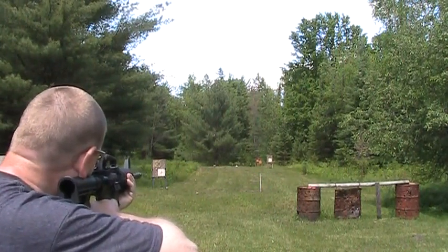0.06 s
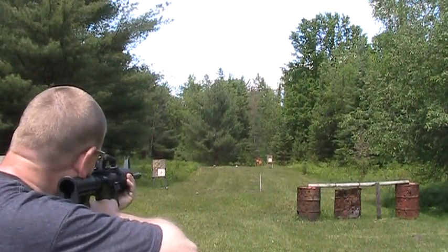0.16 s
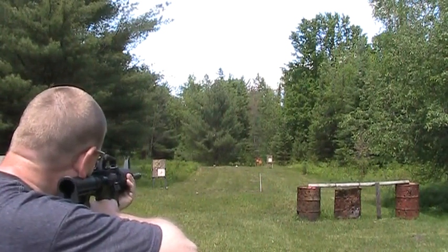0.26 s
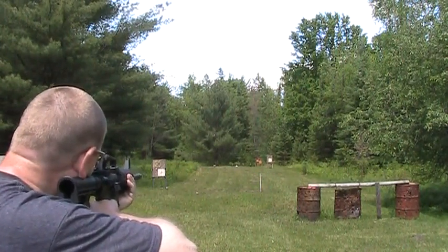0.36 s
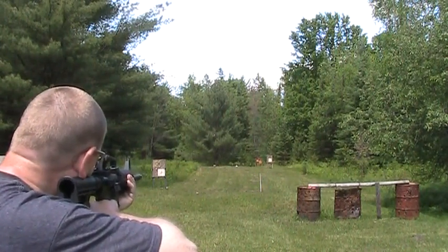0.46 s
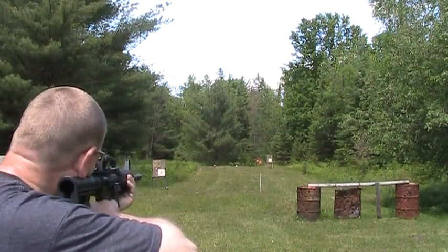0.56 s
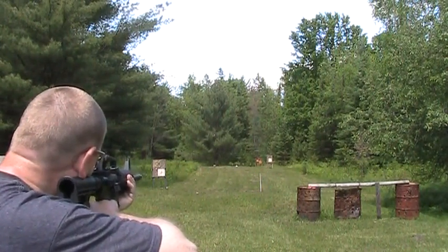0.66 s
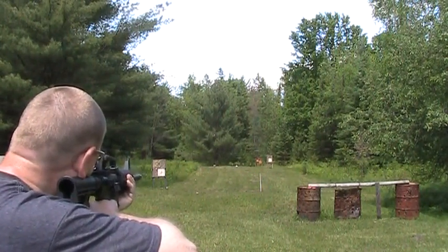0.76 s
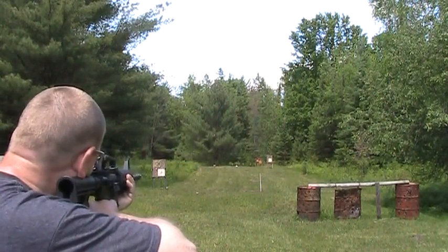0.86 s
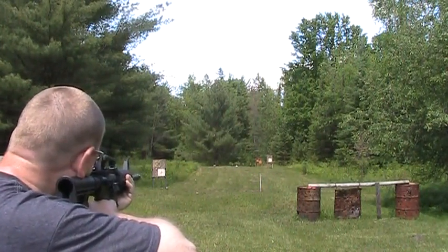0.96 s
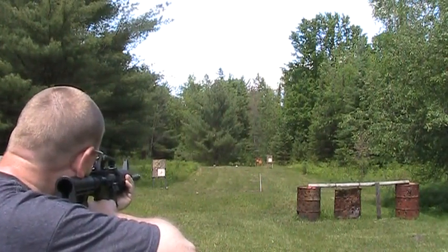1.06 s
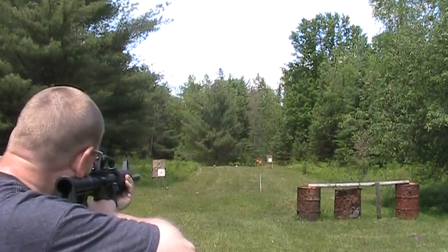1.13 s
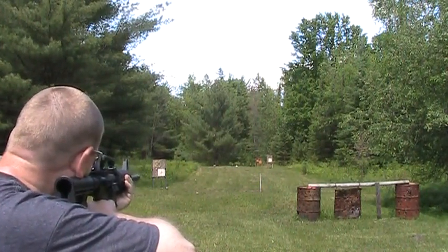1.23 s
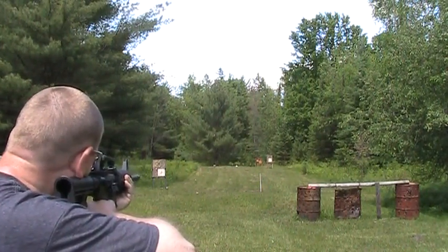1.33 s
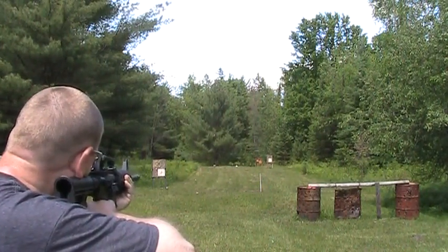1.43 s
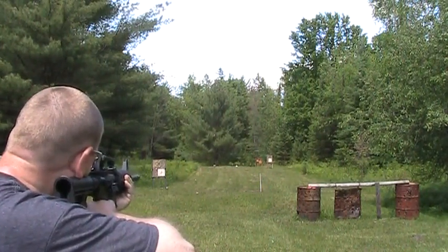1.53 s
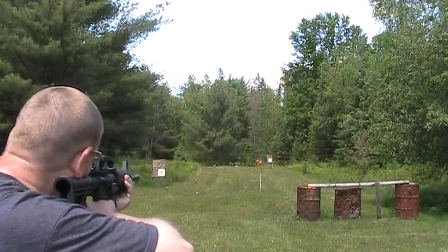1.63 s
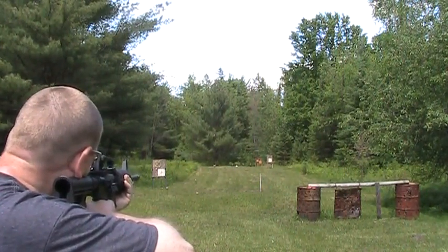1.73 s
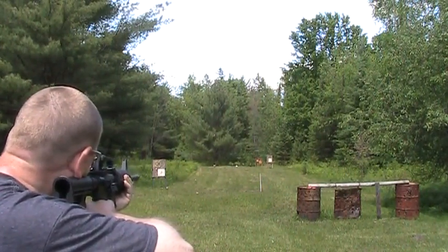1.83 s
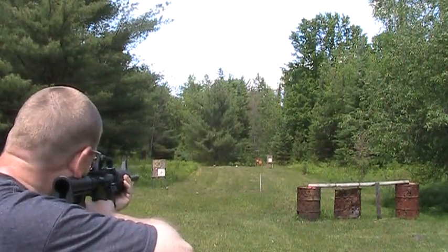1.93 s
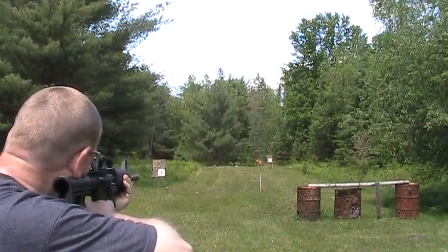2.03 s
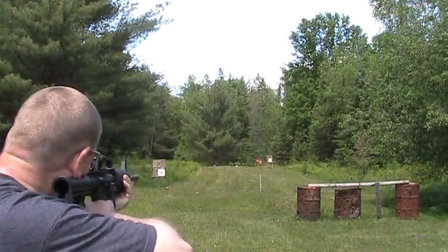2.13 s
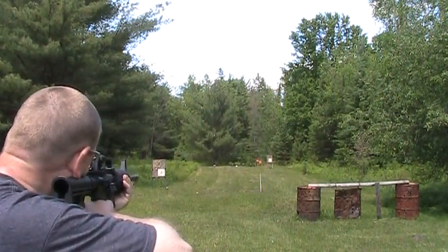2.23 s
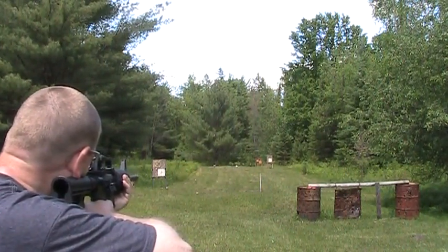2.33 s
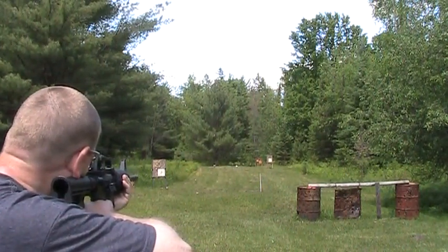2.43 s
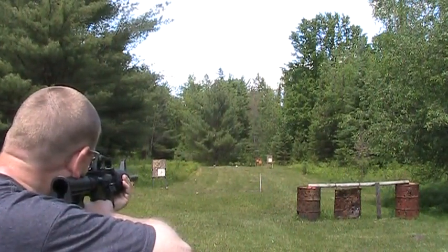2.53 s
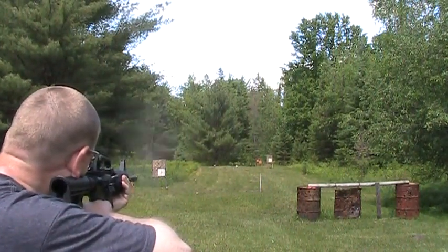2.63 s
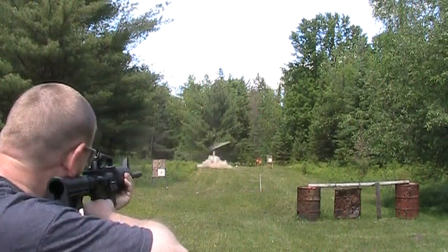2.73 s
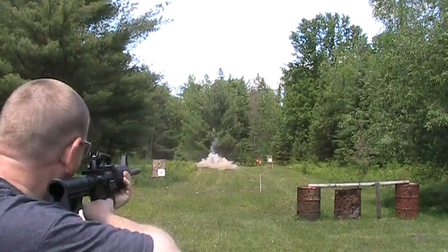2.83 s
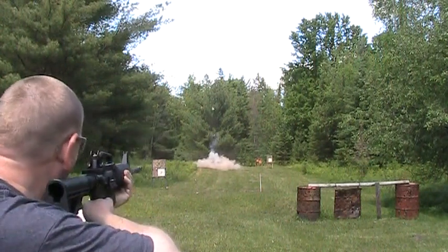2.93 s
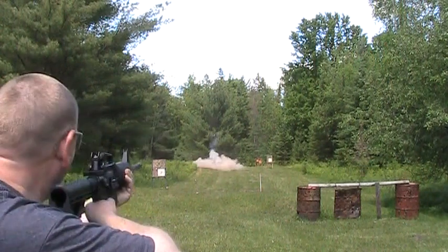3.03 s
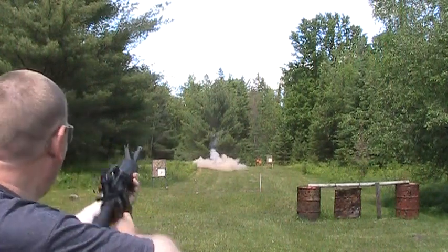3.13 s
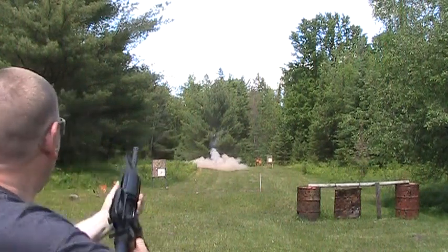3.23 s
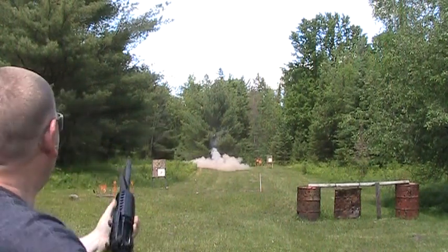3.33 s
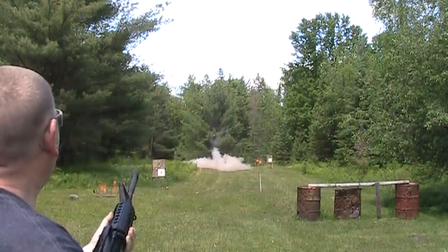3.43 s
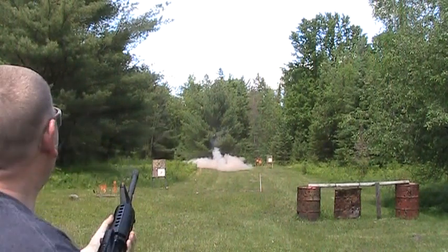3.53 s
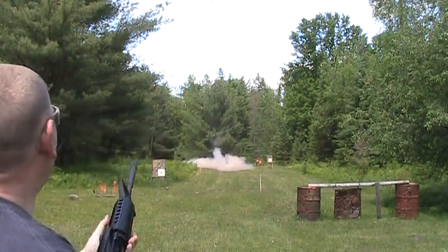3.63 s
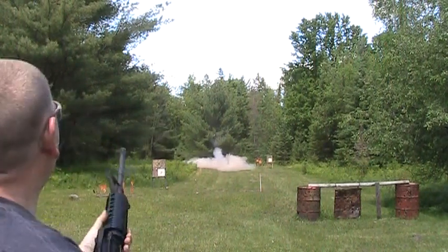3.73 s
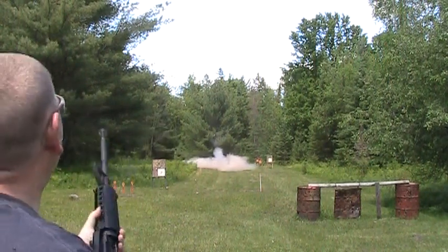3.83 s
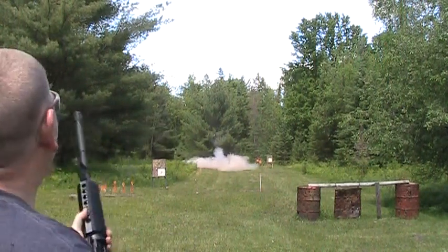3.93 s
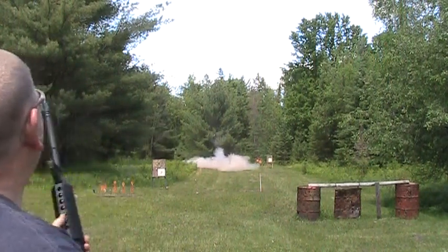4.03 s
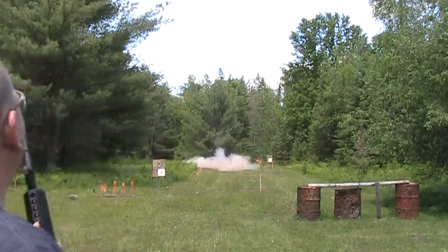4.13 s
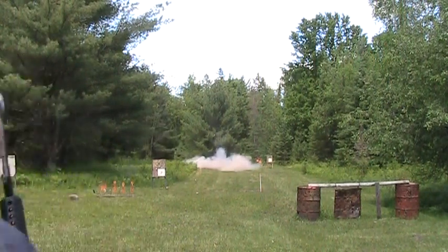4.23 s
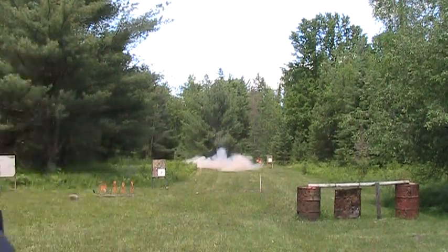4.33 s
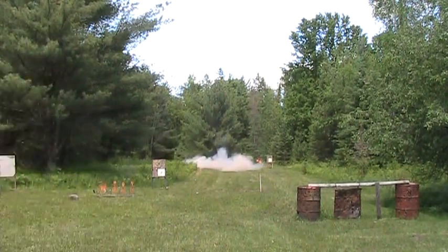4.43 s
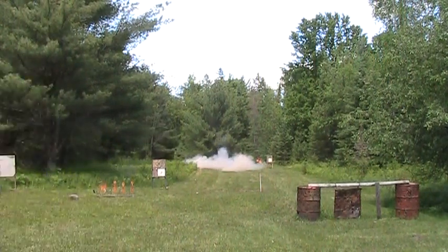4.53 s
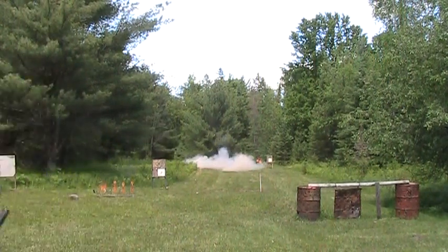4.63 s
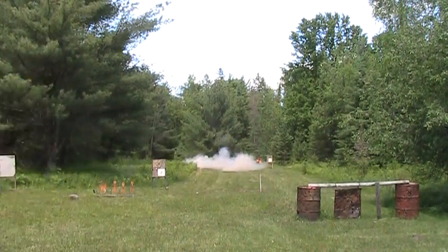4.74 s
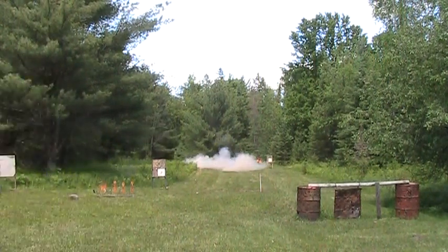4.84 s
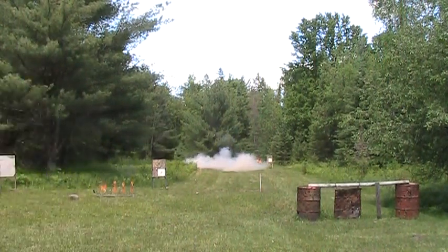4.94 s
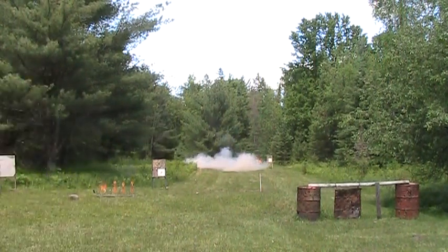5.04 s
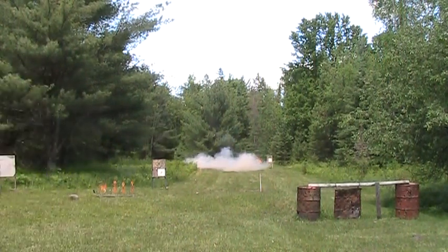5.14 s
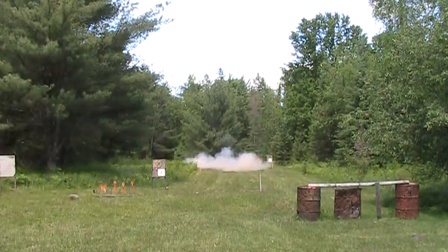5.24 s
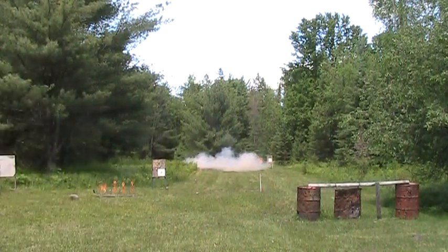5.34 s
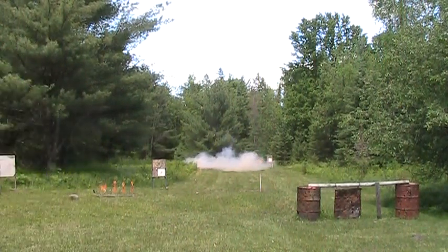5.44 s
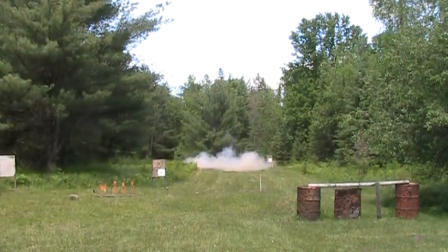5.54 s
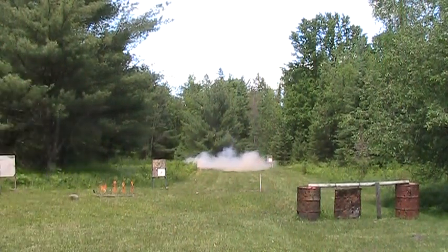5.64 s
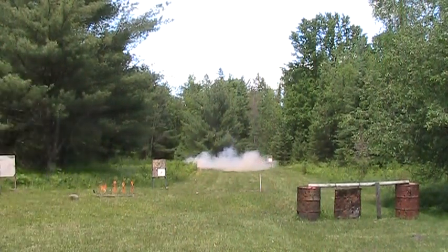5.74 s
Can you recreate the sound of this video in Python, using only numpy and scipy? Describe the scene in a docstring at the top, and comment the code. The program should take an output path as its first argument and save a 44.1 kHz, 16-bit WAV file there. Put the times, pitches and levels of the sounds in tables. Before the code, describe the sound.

Outdoors on a grassy range ringed by trees, soft air hush and quick high bird whistles come first. A rifle cracks close by, and a fifth of a second later a bigger explosion booms, overloading the microphone. Its roar rolls through the woods for over a second, then fades into low rumble, with a brass case ping, faint cloth rustle, dry snaps and wind thumps.

```python
"""A rifle is fired down a grassy range ringed by forest; a fifth of a second later its exploding target
answers. Both are sharp shock fronts that overload the microphone, then shaped noise that rolls through the
trees, duller with every metre of air. The spent case pings as a few decaying resonances. A small bird twitters
in gliding whistles before the shot. Clothes rustle, a few dry snaps sound nearby and a breeze bumps the
microphone: all bursts of coloured noise over a steady hush."""
import sys
import numpy as np
from scipy import signal
from scipy.fft import rfft, irfft, next_fast_len
from scipy.io import wavfile

SR = 44100
rng = np.random.default_rng(int(sys.argv[2]) if len(sys.argv) > 2 else 0)


def output_pcm(signal):
    """Save a mono or channel-first signal as 16-bit PCM at the path in sys.argv[1].

    Samples are clipped to [-1, 1] before scaling.
    """
    pcm = np.clip(np.atleast_2d(signal).T, -1, 1) * 32767
    wavfile.write(sys.argv[1], SR, np.round(pcm).astype(np.int16))


N = 255339
TIME = np.arange(N) / SR  # s
SIZE = next_fast_len(N)
FREQS = np.maximum(np.arange(SIZE // 2 + 1) * SR / SIZE, 1)  # Hz
SIDES = np.array([[1], [-1]])  # sign of the side signal in left and right
SHOT_S, BLAST_S = 2.7738, 2.9892

# stereo width of the echoes from the woods: frequency_hz, side_minus_mid_db
WOODS_WIDTH = [(60, -3), (120, -11), (300, -21.5), (700, -14), (1300, -11), (2400, -8), (8000, -3),
               (15000, 4)]
# colour of cloth and of small ticks: frequency_hz, relative_level_db
RUSTLE_COLOUR = [(1000, 0), (3000, 2.5), (5000, -2.5), (7500, -4), (11000, -12.5), (15500, -17)]


def from_db(db):
    """Decibels to gain."""
    return 10 ** (np.asarray(db) / 20)


def at_hz(points, hz):
    """A spectrum in dB read on a log-frequency axis."""
    points = np.array(points)
    return np.interp(np.log(hz), np.log(points[:, 0]), points[:, 1])


def butter(x, hz, kind, order=2):
    """Causal low- or high-pass."""
    sections = signal.butter(order, min(hz, .45 * SR), kind, fs=SR, output="sos")
    return signal.sosfilt(sections, x + 1e-18)


def filtered(spectrum):
    """Stereo spectrum back to sound."""
    return irfft(spectrum, SIZE)[:, :N]


def dying(start, t60):
    """Envelope that jumps to 1 and falls 60 dB in t60 seconds."""
    return (TIME >= start) * np.exp(-np.log(1000) * np.clip((TIME - start) / t60, 0, 10))


def swell(centre, half):
    """Bell-shaped envelope of height 1."""
    return np.exp(-np.minimum(((TIME - centre) / half) ** 2 / 2, 20))


def together(*levels):
    """Levels of unrelated sounds add in power."""
    return np.sqrt(sum(level ** 2 for level in levels))


def wander(per_s):
    """Random drift with a spread of about 1, heading for per_s new values a second."""
    return np.interp(TIME * per_s, np.arange(1024), rng.standard_normal(1024))


def noise(colour, side_db, grain=1):
    """Stereo noise of a given colour and width, its middle at rms 1; grain weights each of its tiny impulses."""
    mid, side = rfft(rng.standard_normal((2, N)) * grain, SIZE) * from_db(at_hz(colour, FREQS))
    x = filtered(mid + side * from_db(side_db) * SIDES)
    return x / x.mean(axis=0).std()


def trees(uneven_db, size=64):
    """Uneven strength of tiny grains, size samples each, such as the echoes of trunks and crowns."""
    return from_db(uneven_db * np.repeat(rng.standard_normal(N // size + 1), size)[:N])


def through_air(x, start, loss_db, power):
    """Later echoes have crossed more air: loss_db per second at 1 kHz, rising as a power of frequency."""
    spectrum, age, out = rfft(x, SIZE), np.maximum(TIME - start, 0), 0
    centres = np.geomspace(250, 16000, 16)  # Hz
    for hz, pick in zip(centres, np.eye(len(centres))):
        # overlapping triangular bands that add up to the whole spectrum
        band = filtered(spectrum * np.interp(FREQS, centres, pick))
        out = out + band * from_db(-loss_db * (hz / 1000) ** power * age)
    return out


def hush():
    """A steady hush under everything: noise that sinks from the shot to the blast, then slowly comes back up."""
    # colour of the steady hush: frequency_hz, relative_level_db
    hush_colour = [(25, -9.5), (45, -11), (90, -1), (150, -4), (190, 2.5), (235, -2.5), (600, -5.5),
                   (1200, -11), (2400, -17.5), (4300, -22.5), (5600, -22.5), (7000, -26), (11000, -32),
                   (15500, -34.5)]
    # its stereo width: frequency_hz, side_minus_mid_db
    hush_width = [(100, 3.5), (400, 3.5), (2400, 3.5), (5000, 4.5), (15000, 0)]
    level_db = -57 + np.interp(TIME, [SHOT_S, BLAST_S, 5.8], [0, -15, -4])
    return from_db(level_db) * noise(hush_colour, at_hz(hush_width, FREQS))


def breeze():
    """Eddies push on the two microphone ports, often in opposite directions."""
    # gusts on the microphone: centre_s, level_db, half_length_s, side_minus_mid_db
    gusts = [(0.195, -54.5, 0.11, 1), (0.627, -37, 0.029, 7), (0.797, -43, 0.091, 5),
             (1.316, -44.5, 0.07, 6.5), (1.634, -49, 0.11, 7), (4.85, -33, 0.014, 8),
             (5.033, -34.5, .025, 9), (5.153, -28, 0.025, 11), (5.34, -34, 0.074, 16),
             (5.562, -26, 0.029, 10), (5.643, -33, 0.031, 17), (5.763, -42, 0.041, 15.5)]
    # colour of the gusts: frequency_hz, relative_level_db
    gust_colour = [(20, 5), (45, 0.5), (85, 4), (150, -13), (300, -18), (700, -44), (2000, -68)]
    common, opposed = noise(gust_colour, 0)
    out = 0
    for s, db, half, side_db in gusts:
        side = from_db(side_db)
        push = (common + side * opposed * SIDES) / np.hypot(1, side)
        out = out + from_db(db) * swell(s, half) * push
    return out


def clothes():
    """Cloth slides in many tiny slips as the shooter lowers the rifle and steps aside, swelling with each stroke."""
    # strokes of cloth: centre_s, level_db, half_length_s
    strokes = [(4.249, -54, .011), (4.32, -59.5, .08), (4.672, -58.5, 0.064), (4.83, -60.5, 0.042),
               (5.005, -56, .022), (5.069, -58.5, .02)]
    moving_s, moving_db = 3.9, -64.5  # the faint rustle under the strokes
    moving = from_db(moving_db) * np.clip((TIME - moving_s) / .12, 0, 1)
    level = together(moving, *[from_db(db) * swell(s, half) for s, db, half in strokes])
    return noise(RUSTLE_COLOUR, -2.5, trees(uneven_db=2.0)) * level


def snaps():
    """Dry snaps arrive diffuse: noise with a quick rise, a short decay and a faint tail."""
    # the snaps: start_s, level_db, t60_s, brightness_db_per_octave
    clacks = [(1.258, -47, 0.1, -2), (2.659, -35.5, 0.081, -0.5), (5.511, -39.5, 0.11, -1),
              (5.589, -38.5, 0.11, 0.5), (5.722, -49.5, 0.18, -5.5)]
    # their common colour: frequency_hz, relative_level_db
    clack_colour = [(200, -21), (800, -4.5), (1400, -1), (1900, -1.5), (2550, 3), (3400, 1.5), (4600, -1),
                    (5700, -1.5), (6500, 0), (8500, -8.5), (10000, -10), (15500, -25)]
    spectrum, out = rfft(noise(clack_colour, -1.5), SIZE), 0
    octaves = np.log2(np.maximum(FREQS, 700) / 4000)  # the tilt pivots at 4 kHz
    for s, db, t60, tilt_db in clacks:
        burst = filtered(spectrum * from_db(tilt_db * octaves))
        decay = dying(s, t60) + from_db(-18.0) * dying(s, t60=0.27)
        rise = np.clip((TIME - s) / 0.0058, 0, 1)
        out = out + from_db(db) * burst * decay * rise
    return out


def whistle(s, db, hz, shape):
    """One bird note: a sine whose glide bends downward."""
    # note shapes by name: level_db, pitch_offset_hz, glide_hz_per_ms, half_length_s
    notes = {"soft": (-7.5, -390, -20, .004), "up": (-1.5, 30, 90, .0037), "down": (0, -10, -36, .0078)}
    note_db, offset_hz, glide, half = notes[shape]
    near, out = np.abs(TIME - s) < 3 * half, np.zeros(N)
    t = TIME[near] - s
    ms = 1000 * t
    pitch = hz + offset_hz + glide * ms - 3.0 * ms ** 2
    envelope = np.exp(-np.abs(t / half) ** 3.5)
    out[near] = from_db(db + note_db) * envelope * np.sin(2 * np.pi * np.cumsum(pitch) / SR)
    return out


def bird():
    """Quick phrases of short whistles, with a scatter from the leaves and a faint wash behind."""
    # the phrases: first_note_s, level_db, pitch_hz, first_gap_s, later_gaps_s, note_names
    phrases = [(.043, -48.5, 5680, .038, .038, "up down"), (.197, -48, 5750, 0.027, .036, "soft down down"),
               (0.511, -47.5, 5760, 0.029, .033, "soft down down"),
               (.77, -46, 5750, 0.027, .033, "soft down down"),
               (.985, -46, 5770, 0.027, .036, "soft down down"),
               (1.536, -45.5, 5760, 0.031, .034, "soft down down"),
               (1.764, -45.5, 5760, .022, .036, "soft up down"),
               (2.005, -45.5, 5790, .02, .0375, "soft up down down"),
               (2.299, -46.5, 5770, 0.022, .0385, "soft up down down")]
    growth_db = .8  # each note outdoes the one before
    song = np.zeros(N)
    for s, db, hz, first_gap, later_gap, shapes in phrases:
        for k, shape in enumerate(shapes.split()):
            song += whistle(s, db + k * growth_db, hz, shape)
            s += later_gap if k else first_gap
    leaves = rng.standard_normal((2, N)) * (dying(.014, t60=.14) + .2 * dying(.02, t60=.75))
    leaves /= np.linalg.norm(leaves[0])
    wash = signal.fftconvolve(song[None], leaves, axes=1)[:, :N]
    return song + from_db(-8.5) * wash


def metal():
    """Small hard contacts tick; the first sets the modes of the brass case ringing."""
    # the spent case lands, then the rifle's fittings tick: start_s, level_db
    contacts = [(3.5093, -32.5), (3.841, -54), (4.239, -61), (4.4227, -52), (4.525, -53), (4.86, -51),
                (5.2289, -68.5)]
    # modes of the case, close pairs beat: frequency_hz, relative_level_db, t60_s
    case_modes = [(5700, 10.5, 0.018), (6240, 9, .025), (10940, -19.5, 0.27), (10985, -24, .22),
                  (14890, -7.5, .24), (14935, -14, .2)]
    case_ring_db = -42.5
    levels = sum(from_db(db) * dying(s, t60=0.016) for s, db in contacts)
    out = levels * butter(noise(RUSTLE_COLOUR, 2.0), 4500, "high")
    blow = np.zeros(N)
    blow[round(contacts[0][0] * SR)] = from_db(case_ring_db)
    for hz, db, t60 in case_modes:
        # two-pole resonator: pole radius r, angle w
        r, w = from_db(-60 / (t60 * SR)), 2 * np.pi * hz / SR
        ring = signal.lfilter([0, np.sin(w)], [1, -2 * r * np.cos(w), r * r], blow + 1e-18)
        # the spinning case shows its open end to each side in turn, 47 times a second
        phase = rng.uniform(0, 2 * np.pi, (2, 1))
        tumble = 1 + .45 * np.sin(2 * np.pi * 47 * TIME + phase)
        out += from_db(db) * ring * tumble
    return out


def explosion():
    """The forest returns the blast as a long roar over a slower rumble whose deepest part follows the roar."""
    # colour of the roll on arrival: frequency_hz, relative_level_db
    roll_colour = [(20, -23), (42, -13), (70, 2), (115, 1), (175, -2), (250, -4.5), (400, 0.5), (650, 3.5),
                   (1100, 2), (2200, -1.5), (4500, -7.5), (7500, -11), (11000, -22.5), (16000, -28.5)]
    # the roar holds while the blast crosses the forest, then dies away over a distant tail
    roar_db, sag_db_per_s, hold_s, release_db_per_s = -12.5, -0.4, 1.238, 17  # negative sag: it grows
    distant_db, distant_db_per_s = -18, 3.5
    # the rumble: a first thump, then a long decay
    thump_db, thump_t60_s = -17.5, 1.84
    rumble_db, rumble_db_per_s = -34, 4.5
    deep_db, deep_follows = -33, 0.86  # the exponent sets how far the deepest part follows the roar
    # the far tree line returns a dull swell of its own
    return_db, return_s, return_half_s, return_hz = -26.5, 4.28, 0.22, 406

    width_db = at_hz(WOODS_WIDTH, FREQS)
    scatter = noise(roll_colour, width_db, trees(uneven_db=0.65))
    spectrum = rfft(scatter, SIZE)
    bass, deep = [filtered(spectrum / (1 + (FREQS / hz) ** 4)) for hz in (210, 90)]

    age = np.maximum(TIME - BLAST_S, 0)
    forest_db = roar_db - sag_db_per_s * age - release_db_per_s * np.maximum(age - hold_s, 0)
    roll = together(from_db(forest_db), from_db(distant_db - distant_db_per_s * age))
    roar = through_air(scatter - bass, BLAST_S, loss_db=6.5, power=1.268)
    roar = roar * roll * from_db(0.77 * wander(per_s=22))

    thump = from_db(thump_db) * dying(BLAST_S, thump_t60_s)
    long_decay = from_db(rumble_db - rumble_db_per_s * age)
    rumble = (bass - deep) / (bass - deep).std() * together(thump, long_decay)
    rumble += deep / deep.std() * from_db(deep_db) * (roll / roll.max()) ** deep_follows

    far = butter(noise(roll_colour, width_db), return_hz, "low", order=4)
    far = butter(far, 220, "high")
    far *= from_db(return_db) * swell(return_s, return_half_s) / far.std()
    # both fade in 12 ms behind the blast, the rumble more slowly
    roar_rise, rumble_rise = [np.clip((age - .012) / rise_s, 0, 1) for rise_s in (0.0026, 0.011)]
    return (roar + far) * roar_rise + rumble * rumble_rise


def shocks():
    """Shock fronts jump up, sink through zero and end in a longer suction; the blast's rings the microphone."""
    # fronts and hard echoes: start_s, level_db (before the low-pass), positive_phase_s, right_lead_s, low_pass_hz
    fronts = [(2.7738, 4, .0005, 0, 9000), (2.809, -1, .0004, 0, 2000), (2.839, -4, .0003, 0, 6000),
              (2.9892, 14, .00028, .0001, 9000), (2.9904, 5, .0019, .0003, 5000),
              (2.9987, -2, .003, .0003, 2000), (3.02, 0, .0011, 0, 2000), (3.2695, -1, .0006, 0, 1500),
              (3.39, -6, .0006, 0, 1300), (3.417, -7, .0005, 0, 1300)]
    out = np.zeros((2, N))
    for s, db, length, lead, edge_hz in fronts:
        age = (TIME - s + np.array([[0], [lead]])) / length  # in positive phases
        front = (age >= 0) * (1 - age) * np.exp(-np.clip(age, 0, 40))
        out += from_db(db) * butter(front, edge_hz, "low")
    ring_hz = 6300
    ring = np.sin(2 * np.pi * ring_hz * (TIME - BLAST_S)) * dying(BLAST_S, t60=0.0014)
    return out + from_db(12.0) * ring


def rifle():
    """The muzzle blast: a bright tearing crack, and its scatter from the ground, nearest trees and far woods."""
    # colour of the report: frequency_hz, relative_level_db
    muzzle_colour = [(25, -22), (70, -20), (130, -17.5), (200, -4.5), (380, 1), (700, 2), (1200, -2),
                     (2300, -6), (3400, -9.5), (4600, -15.5), (8000, -17.5), (11000, -28), (16000, -35)]
    # single echoes of the report: centre_s, scatter_db, crack_db
    report_echoes = [(2.807, -6.5, -44), (2.839, -19.5, -16), (2.857, -9, -29.5), (2.902, -16.5, -40.5),
                     (2.938, -16, -46), (2.983, -10, -52)]
    echo_rise_s, echo_t60_s = 0.0043, 0.08
    muzzle_db, muzzle_t60_s = 3.5, .03
    near_db, near_t60_s = -1, 0.25  # ground and nearest trees
    far_db, far_t60_s = -12, 1.6  # far woods
    # the crack holds briefly, then collapses
    crack_db, crack_hold_s, crack_t60_s = 3, 0.0049, 0.06

    body = together(from_db(muzzle_db) * dying(SHOT_S, muzzle_t60_s),
                    from_db(near_db) * dying(SHOT_S, near_t60_s),
                    from_db(far_db) * dying(SHOT_S, far_t60_s))
    hold_end = SHOT_S + crack_hold_s
    edge = from_db(crack_db) * np.where(TIME < hold_end, 1, dying(hold_end, crack_t60_s))
    for s, echo_scatter_db, echo_crack_db in report_echoes:
        echo = np.where(TIME < s, swell(s, echo_rise_s), dying(s, echo_t60_s))
        body = together(body, from_db(echo_scatter_db) * echo)
        edge = together(edge, from_db(echo_crack_db) * echo)

    scatter = noise(muzzle_colour, at_hz(WOODS_WIDTH, FREQS), trees(uneven_db=2.0))
    scatter = through_air(scatter, SHOT_S, loss_db=0.5, power=2.0)
    crack = butter(noise(muzzle_colour, -0.79), 6800, "high")
    return (scatter * body + crack / crack.std() * edge) * (TIME >= SHOT_S)


def scene():
    """Shot and blast over the quiet range, the shock fronts and the roll a little louder on the left."""
    boom = (shocks() + explosion()) * from_db([[.4], [-.4]])
    return hush() + breeze() + clothes() + snaps() + bird() + metal() + boom + rifle()


def record(dry):
    """The microphone overloads on the peaks; the deepest bass and the top are cut."""
    ceiling = 0.6
    squashed = dry / (1 + (dry / ceiling) ** 4) ** (1 / 4)
    no_rumble = butter(squashed, 27, "high")
    return signal.sosfilt(signal.ellip(10, .1, 80, 15500, fs=SR, output="sos"), no_rumble)


dry = scene()
out = record(dry)
output_pcm(out)
```